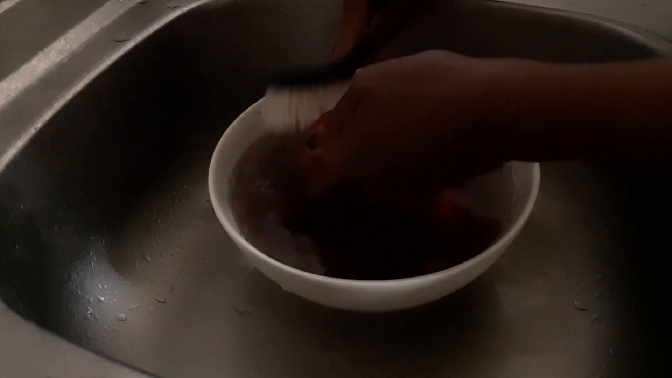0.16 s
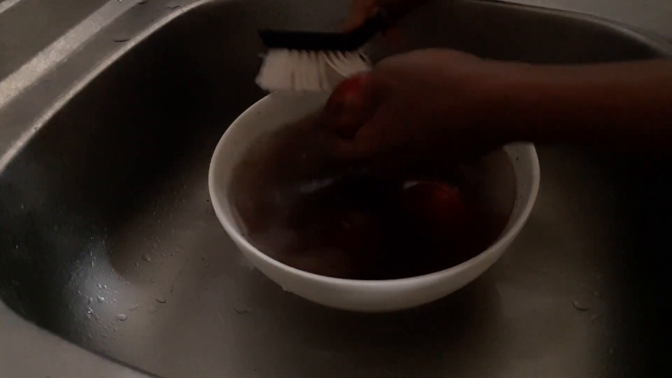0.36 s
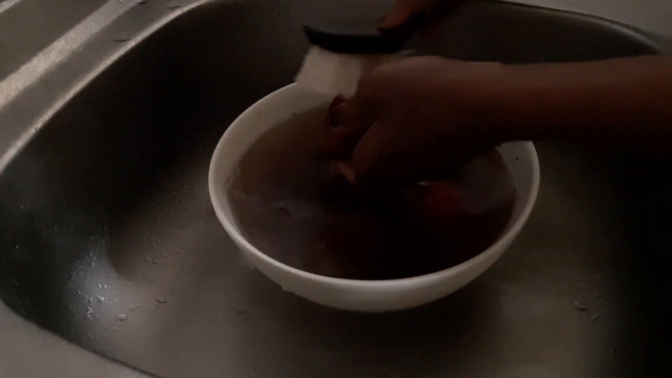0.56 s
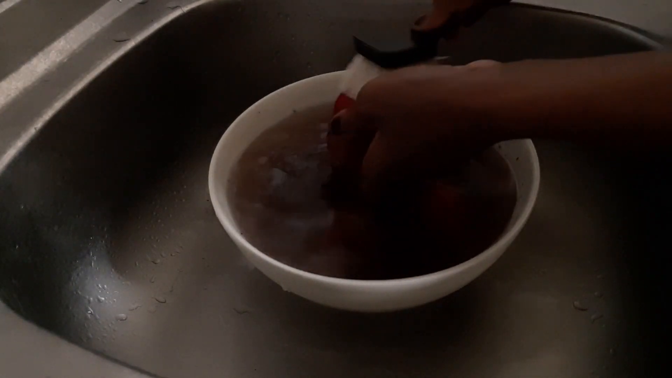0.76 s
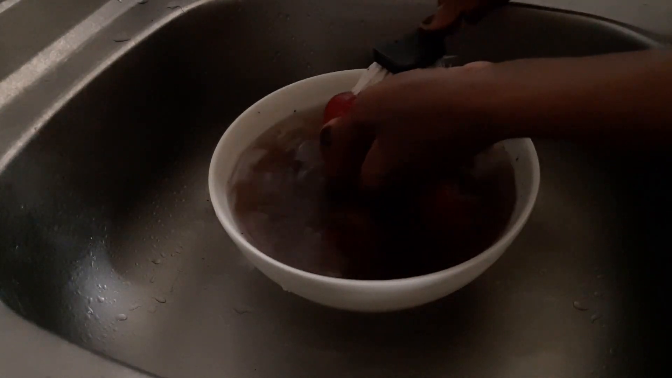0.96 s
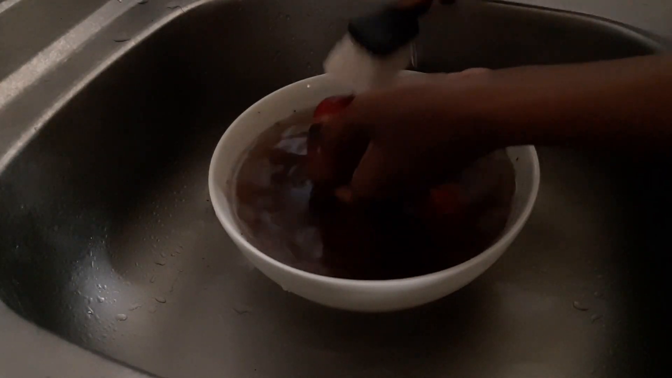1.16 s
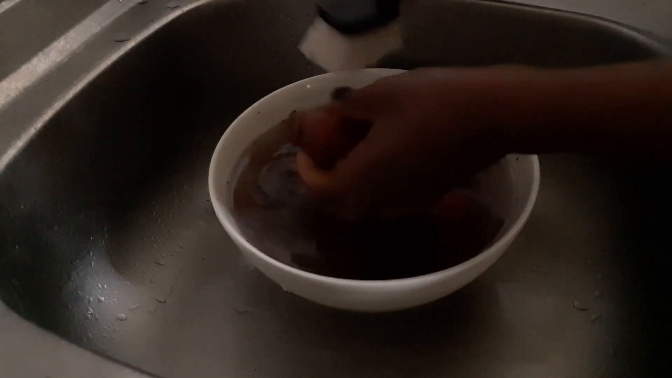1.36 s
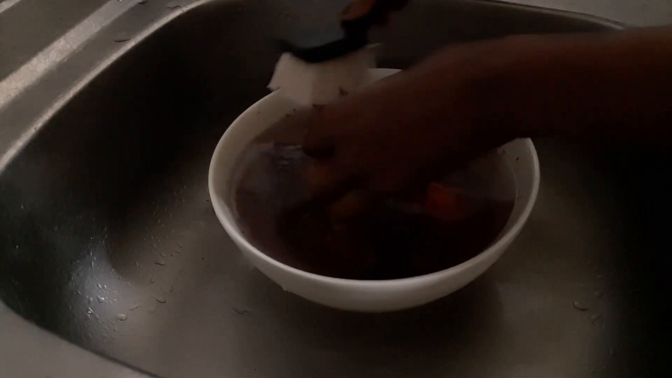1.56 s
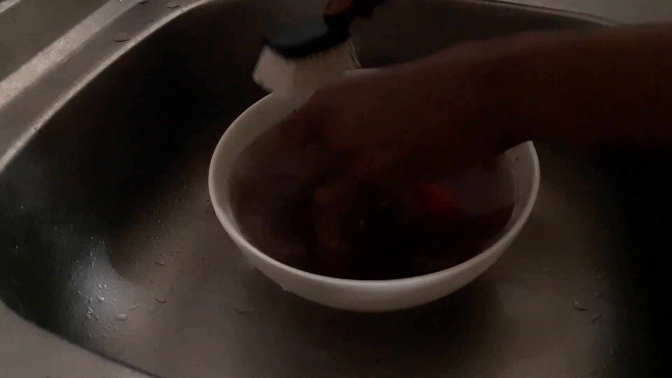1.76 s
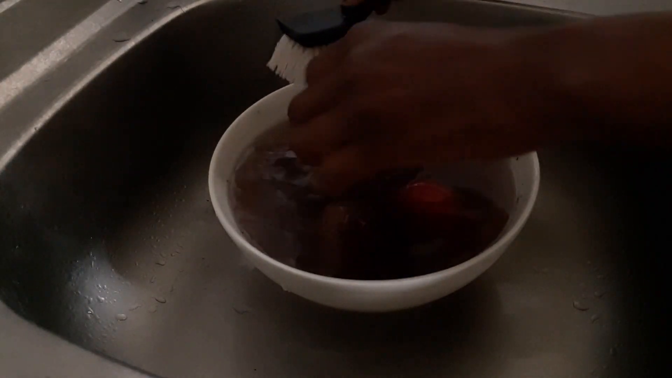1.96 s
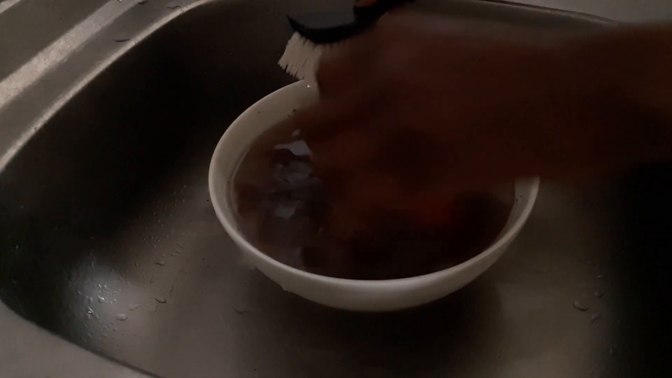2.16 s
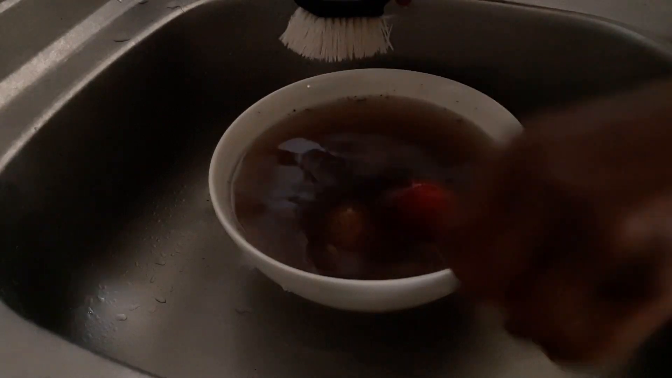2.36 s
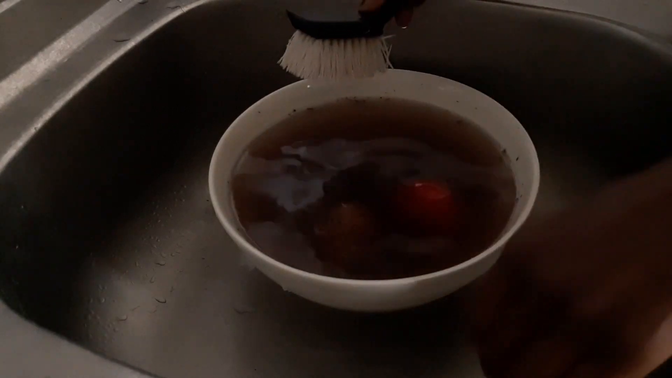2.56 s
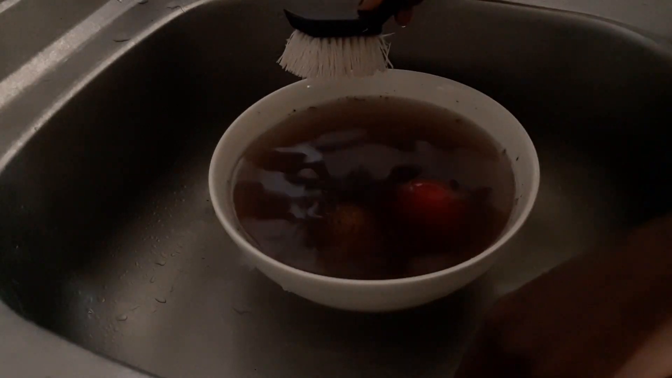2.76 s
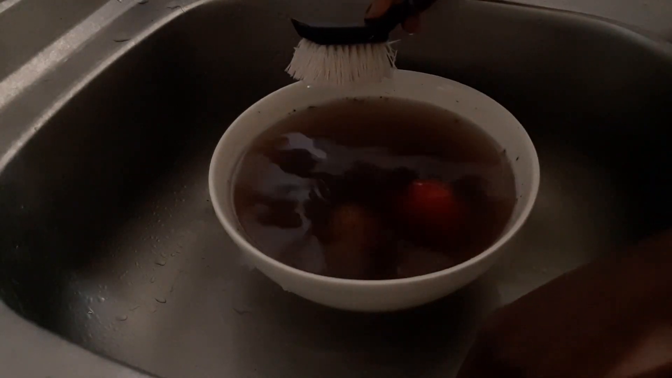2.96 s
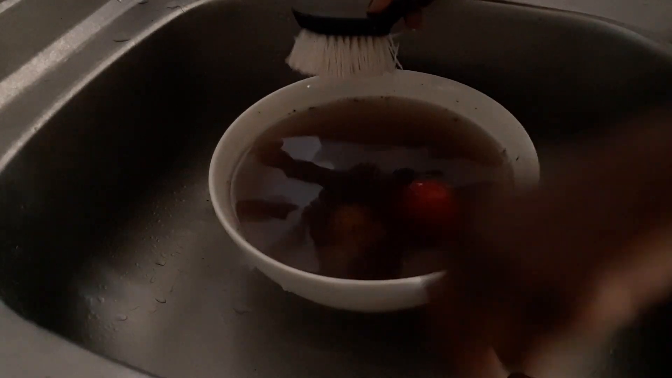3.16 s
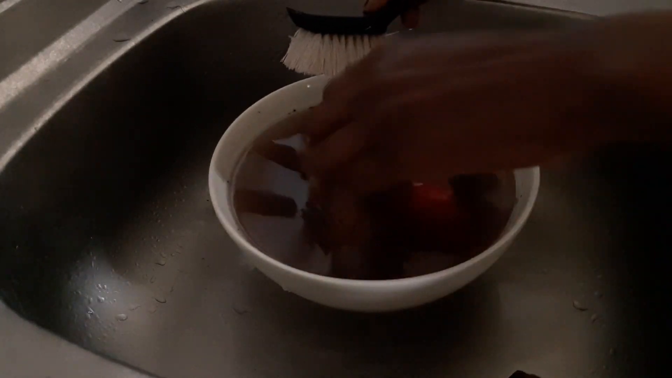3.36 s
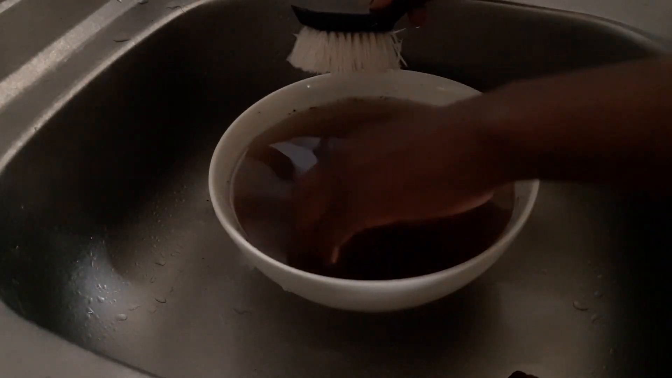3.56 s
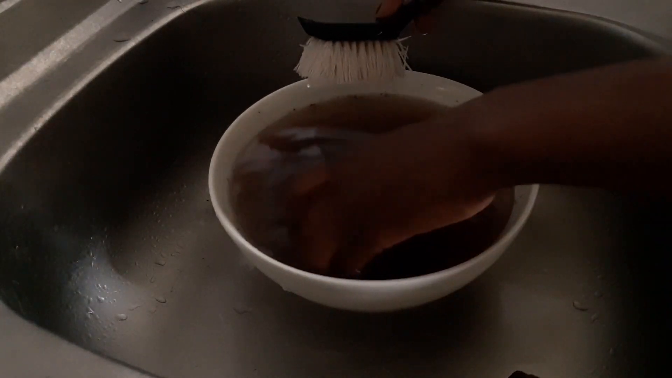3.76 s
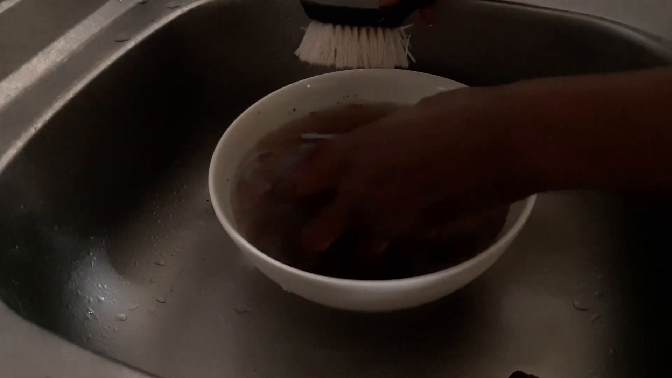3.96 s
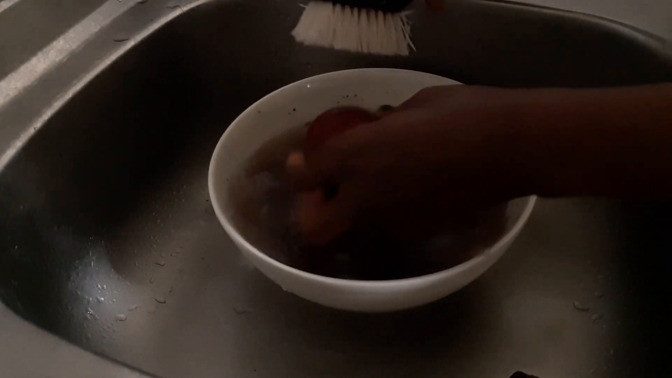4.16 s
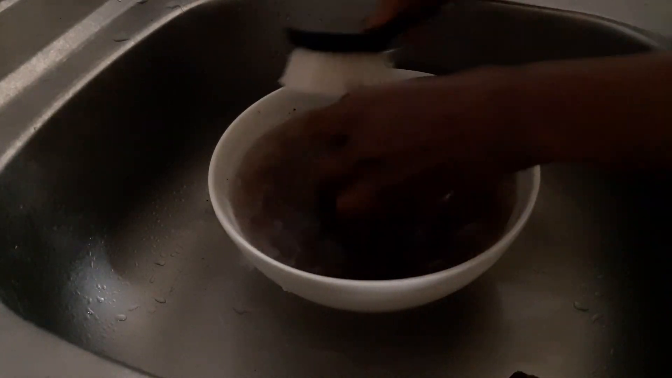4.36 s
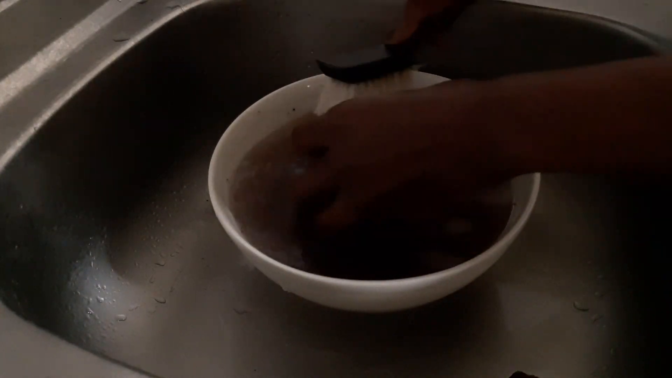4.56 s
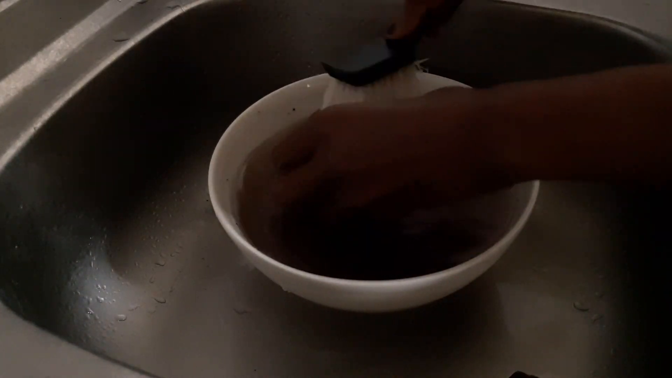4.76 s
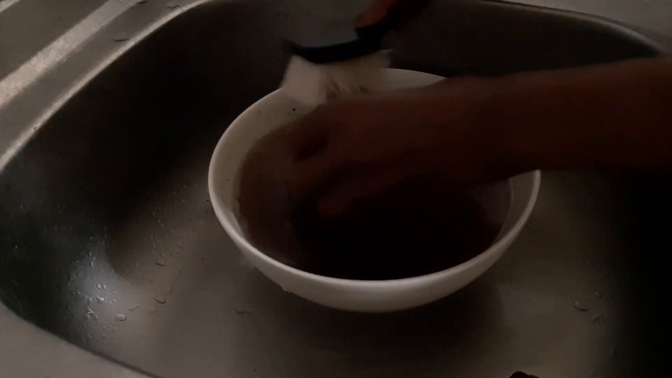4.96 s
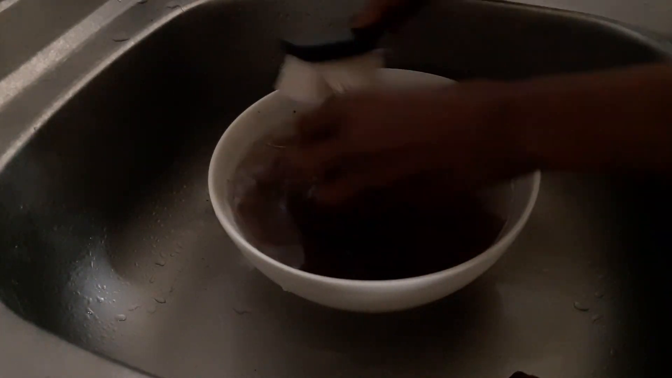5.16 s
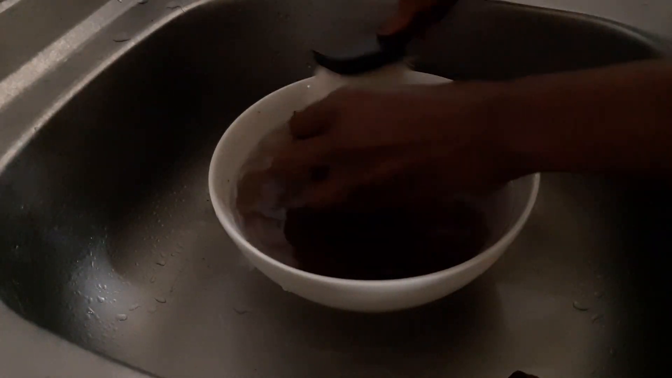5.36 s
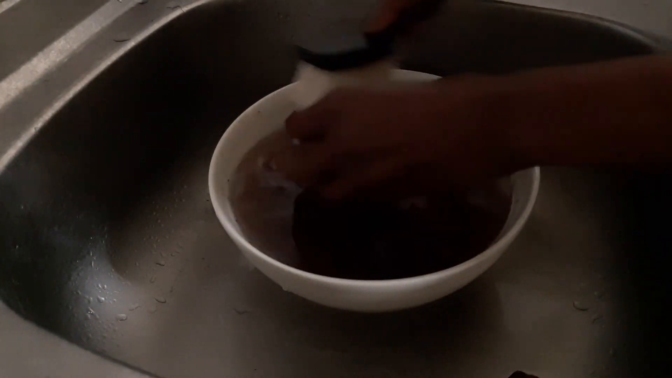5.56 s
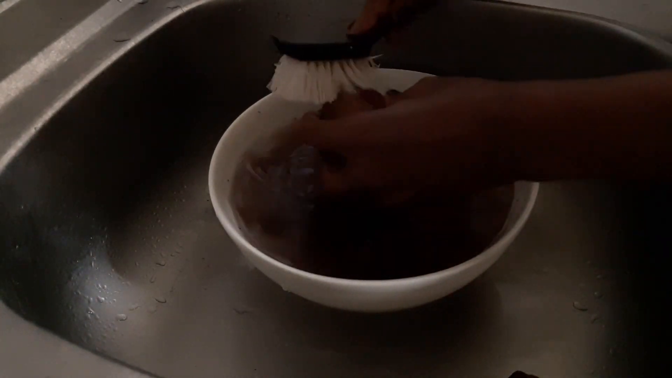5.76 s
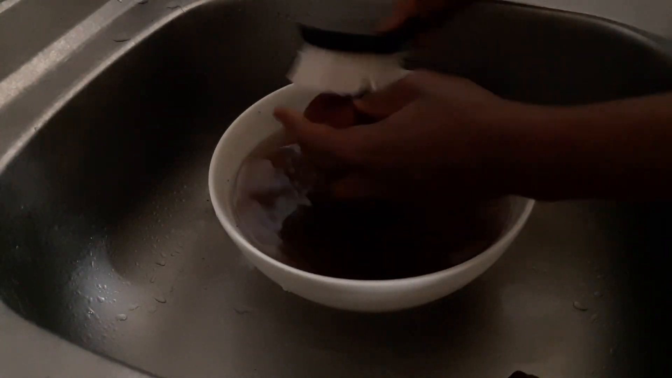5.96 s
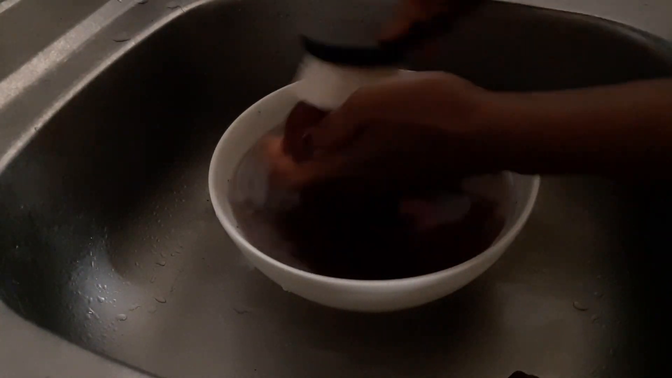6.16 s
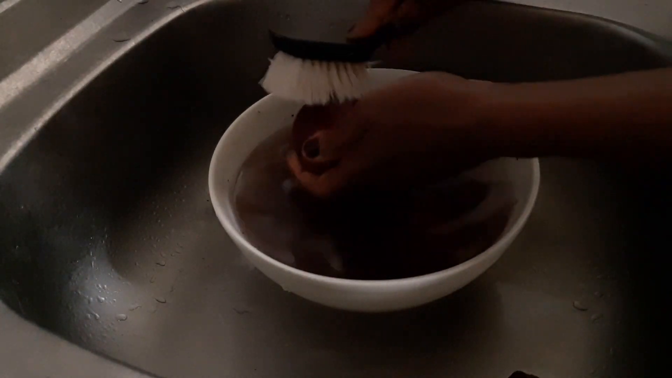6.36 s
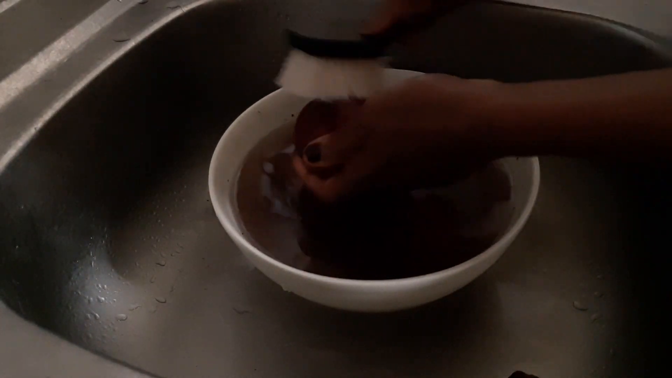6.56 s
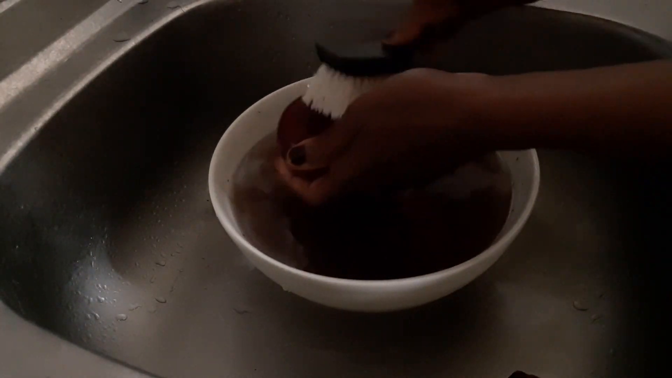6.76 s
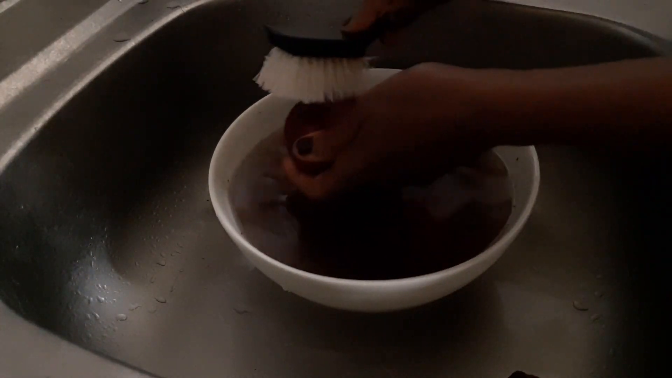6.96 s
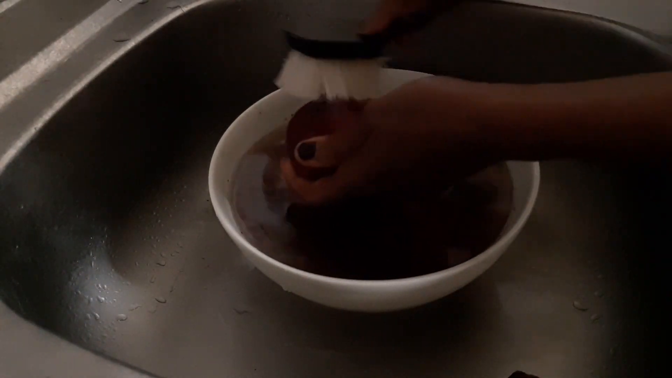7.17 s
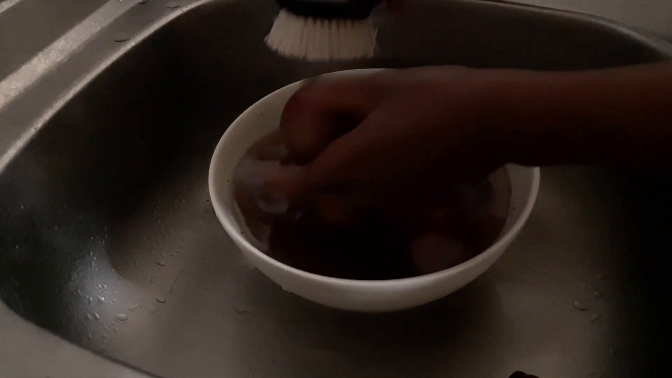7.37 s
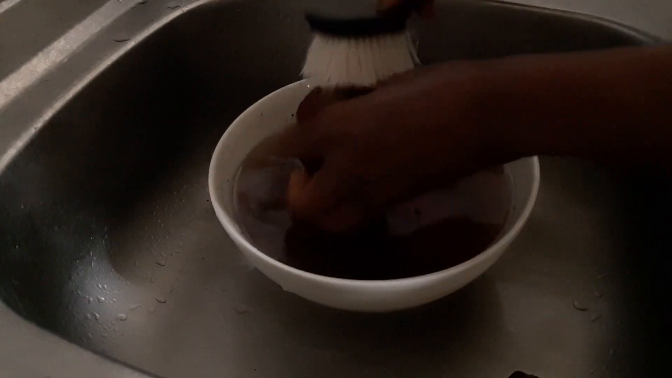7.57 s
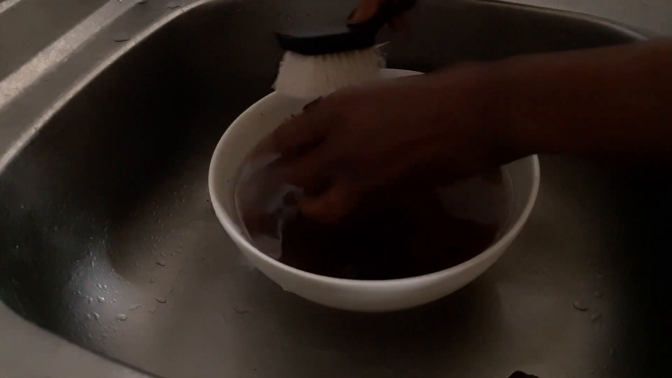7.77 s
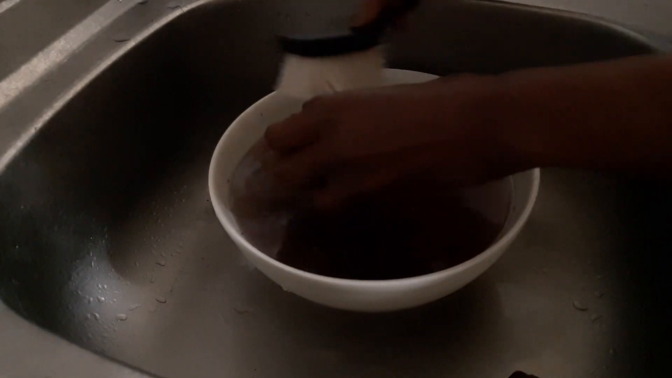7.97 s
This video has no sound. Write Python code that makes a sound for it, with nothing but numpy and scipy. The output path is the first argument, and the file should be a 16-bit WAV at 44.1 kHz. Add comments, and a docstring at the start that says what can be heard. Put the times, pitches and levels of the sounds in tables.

```python
"""Scrubbing roots in a steel sink

A stiff brush scrubs roots over a bowl of water, close up and in stereo. Bristles flick off the skin in
dense clicks that swell with each stroke. Blows and shoves make the sink floor boom, and the bowl clacks,
ticks and is scraped, all over a faint steady hiss."""
import sys
import numpy as np
from scipy import signal
from scipy.fft import rfft, irfft, next_fast_len
from scipy.io import wavfile
from scipy.ndimage import uniform_filter1d

SR = 44100
rng = np.random.default_rng(int(sys.argv[2]) if len(sys.argv) > 2 else 0)


def generate_wav(signal):
    """Clip the signal to [-1, 1] and save it as 16-bit WAV at the path in sys.argv[1]."""
    frames = np.transpose(np.atleast_2d(signal))
    scaled = np.clip(frames, -1, 1) * 32767
    pcm = np.round(scaled).astype(np.int16)
    wavfile.write(sys.argv[1], SR, pcm)


N = 353241
TIME = np.arange(N) / SR


def brush():
    """Pressure swells the bristle clicks; fine tips brighten them, and the drag sounds in the block."""
    # strokes: t/s of full pressure, pressure/dB, rise/s, fall/s, fine tips/dB over the pressure
    strokes = [(.423, -72, .002, 0.025, 12), (.453, -65.5, .002, 0.04, 20), (0.518, -56, 0.077, 0.061, 9),
               (0.634, -53.5, .07, 0.054, 9.5), (.739, -56.5, .002, 0.16, 16), (.83, -52, 0.14, 0.085, 7.5),
               (.925, -48, 0.08, 0.1, 5), (1.02, -55.5, 0.085, 0.15, 7.5), (1.058, -44, 0.0046, 0.065, 6),
               (1.168, -54, 0.036, 0.05, 6.5), (1.346, -69, .002, 0.068, 3), (1.434, -57, 0.043, 0.05, 9),
               (1.632, -63.5, .002, 0.13, 5), (1.709, -55, 0.024, 0.06, 9.5),
               (1.814, -50, 0.037, 0.077, 11), (1.864, -50, 0.088, 0.042, -13), (4.424, -66, .002, 0.2, 0),
               (4.501, -58, 0.068, 0.07, 6), (4.644, -53, 0.08, 0.056, 6.5), (4.73, -56, 0.067, 0.11, 5),
               (4.768, -51.5, 0.016, 0.063, 7), (4.9, -62, 0.069, 0.034, 6), (4.963, -60.5, .006, 0.073, 7),
               (4.994, -55.5, 0.035, 0.065, 1.5), (5.131, -50.5, 0.027, 0.08, 0),
               (5.169, -53, 0.063, 0.031, -4), (5.288, -55, 0.067, 0.073, 4),
               (5.41, -53.5, 0.039, 0.056, -1), (5.44, -54, 0.063, 0.054, 0.5),
               (5.52, -61.5, .002, 0.096, 14), (5.566, -50, 0.046, 0.062, 3.5),
               (5.714, -53.5, .13, 0.097, 2), (5.852, -51, 0.084, 0.043, 6),
               (6.019, -50.5, 0.062, .055, 4.5), (6.105, -52.5, 0.037, .08, 7),
               (6.16, -50.5, 0.094, 0.049, 1), (6.313, -49.5, 0.052, 0.055, 4.5),
               (6.434, -54, 0.069, .12, 6), (6.572, -59, 0.058, 0.27, 6), (6.682, -49, 0.032, 0.09, 5),
               (6.8, -59.5, 0.037, .08, -5), (6.866, -50.5, 0.049, 0.071, 7), (6.99, -53, 0.054, 0.097, 10),
               (7.032, -49, 0.16, 0.071, 1.5), (7.125, -52, 0.04, 0.12, 3), (7.176, -50.5, 0.082, 0.032, 6),
               (7.26, -50, 0.026, 0.11, 4.5), (7.31, -43.5, 0.029, 0.048, 5), (7.375, -61, .05, .03, -6),
               (7.76, -79, .002, .08, 13), (7.8, -60.5, .012, 0.11, 4), (7.87, -62, 0.085, 0.042, -9),
               (7.99, -55.5, 0.051, .1, 5)]
    # bristle tone on the left: f/Hz, level/dB
    tone_left = [(1290, -37), (2200, -34), (2750, -19), (3050, -11.5), (3390, -9.5), (5760, -7), (6310, -5),
                 (7270, -10), (8870, -8), (10900, 0), (15100, 4.5), (16000, 3)]
    # bristle tone on the right: f/Hz, level/dB
    tone_right = [(1290, -19.5), (2200, -23), (2700, -29), (3050, -12), (3330, -6.5), (5760, -4.5),
                  (6210, -7.5), (7150, 1.5), (8730, 1), (13300, 6), (15100, 3.5), (16000, 7.5)]
    # gain ride on the treble above 13 kHz: t/s, gain/dB
    air_ride = [(.4, -6), (.8, -9.5), (1.1, -7), (1.8, -5), (4.4, -4), (5.2, -1), (6, -4.5), (7, -0.5),
                (8.01, 1)]
    # drag against a pressure of -55 dB: t/s, level/dB
    drag_ride = [(.4, -17.5), (1.2, -25.5), (1.85, -17.5), (4.4, -17), (5.0, -22), (5.5, -19), (6.1, -19),
                 (6.6, -19), (7.0, -19), (7.3, -15), (8.01, -23)]
    clicks = steadied(flattened(bristle_clicks()))
    bristles = np.array([evened(coloured(x, tone)) for x, tone in zip(clicks, (tone_left, tone_right))])
    stems = filtered(bristles, 4, 9500)
    tips = filtered(bristles, 4, 9500, "high")
    tips = filtered(tips, 3, 13000) + ride(air_ride) * filtered(tips, 3, 13000, "high")
    power = np.array([swell(*stroke[:4]) ** 2 for stroke in strokes])
    pressure = np.sqrt(power.sum(0))
    tip_gain = np.sqrt(gain_of([stroke[4] for stroke in strokes]) ** 2 @ power)
    follow = 0.85  # the drag follows the pressure only in part
    pull = ride(drag_ride) * pressure ** follow * gain_of(-55) ** (1 - follow)
    scrub = pressure * evened(stems) + tip_gain * evened(tips) + pull * drag(clicks)
    return gain_of(2.5) * panned(8) * scrub


def bristle_clicks(per_s=18000, spread_db=1.7, bunch_db=1.5, busy_db=4.0, tufts=20):
    """Uneven clicks in bunches; each tuft has its own pitch, busy moments and scatter to each side."""
    size_db = spread_db * np.minimum(rng.exponential(1, N), 5) + bunch_db * drift(130)
    impulses = gain_of(size_db) * (rng.random(N) < per_s / SR)
    tuft = rng.integers(0, tufts, N)
    out, t = np.zeros((2, N)), np.arange(2600) / SR
    envelope = decay(t, 0.0067) + decay(t, 0.082, db=-12.5)
    for k, hz in enumerate(np.geomspace(1500, 15000, tufts)):
        noise = rng.standard_normal((2, len(t)))
        scatter = (0.3 * noise + evened(resonate(noise, [(hz, 0.31 * hz, 0)]))) * envelope
        busy = gain_of(busy_db * drift(500))
        out += signal.oaconvolve((impulses * busy * (tuft == k))[None], scatter, axes=1)[:, :N]
    return out


def drag(clicks):
    """The clicks sound in the brush block and bowl hollow; each resonance wavers as the grip changes."""
    # resonances of block and hollow: f/Hz, width/Hz, level/dB
    hollows = [(690, 220, -5), (1130, 260, -13), (1480, 340, -3), (2100, 420, -3), (2450, 500, -3)]
    body = 0
    for k, (hz, width, db) in enumerate(hollows):
        peak = [(hz, width, 0)]
        grip = gain_of(db + 2.5 * drift(4000))
        body += (-1) ** k * grip * evened(resonate(resonate(clicks, peak), peak))
    return evened(filtered(body, 4, (450, 2900), "band"))


def flicks():
    """A clump of bristles lets go: a sharp burst around its own pitch, with a short tail."""
    # bristle clumps: t/s, level/dB, f/Hz
    clumps = [(0.4224, -49.5, 10500), (0.4519, -43.5, 13500), (0.5067, -37, 14700), (0.6559, -29.5, 13100),
              (0.7382, -50, 14800), (0.7761, -41, 10700), (0.8116, -44, 10300), (0.8154, -31, 11900),
              (0.8264, -34, 11800), (0.9088, -36, 9040), (0.9662, -32, 10800), (1.053, -33, 6750),
              (1.3453, -54, 6500), (1.4032, -43, 14200), (1.6307, -43.5, 10600), (1.6541, -42.5, 14700),
              (1.697, -43.5, 6900), (1.7734, -36, 15100), (1.8128, -38, 14100), (4.4228, -48, 15100),
              (4.5067, -38, 15400), (4.6404, -34, 14000), (4.6848, -47, 14400), (4.7636, -30, 14700),
              (4.9804, -42, 15500), (5.1193, -47, 14900), (5.234, -40.5, 15200), (5.5194, -42, 9100),
              (5.9773, -34.5, 10600), (6.1, -32, 14700), (6.1858, -37, 12500), (6.3031, -36, 12500),
              (6.4014, -37, 14300), (6.4384, -40, 13000), (6.4916, -35, 11400), (6.6747, -34, 15400),
              (6.8608, -32.5, 11900), (7.1008, -36, 14800), (7.1237, -36.5, 13000), (7.1681, -31.5, 14200),
              (7.2399, -33.5, 14900), (7.2998, -42, 6200), (7.7588, -63, 15500), (7.7954, -47, 15400),
              (7.9643, -52, 14600)]
    out, t = np.zeros((2, N)), np.arange(2000) / SR
    noises = rng.standard_normal((len(clumps), 2, len(t)))
    pans_db = 7 + 3 * noises[:, 0, 0]  # scattered on the left
    envelope = np.minimum(t / .0005, 1) * (decay(t, .022) + decay(t, .08, db=-13))
    for (s, db, hz), pan_db, noise in zip(clumps, pans_db, noises):
        burst = envelope * (.8 * noise + evened(resonate(noise, [(hz, .25 * hz, 0)])))
        add(out, s, gain_of(db) * panned(pan_db) * burst / abs(burst).max())
    return filtered(out, 5, 3200, "high")


def knocks():
    """A blow rings the sink floor; soft flesh drives the lowest modes, and the bowl rocks as it dies."""
    # blows: t/s, level/dB, hardness as cutoff f/Hz, hand damping/(dB/s) (negative rings longer)
    blows = [(.003, -47, 242, 66), (0.588, -52, 122, 61), (1.063, -50, 129, 54), (3.042, -18, 720, 64),
             (3.745, -59, 254, 56), (3.815, -48, 186, 95), (3.917, -44.5, 122, -8), (4.104, -53, 440, 146),
             (4.307, -40.5, 680, 82), (4.318, -33, 169, 147), (4.364, -37.5, 121, 2), (4.469, -31, 125, 99),
             (4.799, -49, 300, 296), (4.841, -44, 122, 200), (4.884, -49.5, 128, 200),
             (5.367, -49, 124, 54), (6.146, -50.5, 115, 60), (6.456, -52, 118, 60)]
    # modes of the sink floor: f/Hz, level/dB, t60/s
    sink_modes = [(105.4, -3.5, 0.16), (127.6, 5, 0.087), (155, -22, 0.18), (205, -10.5, 0.52),
                  (242.8, 4, 0.18), (284, -0.5, 0.2), (344.2, -3, 0.37), (404, -7, 0.18), (477, -8, 0.17),
                  (521, -10, 0.2), (557, -14, 0.2), (675, -9.5, 0.077), (720, -9.5, 0.08), (765, -36, 0.21)]
    out, t = np.zeros(N), np.arange(SR // 2) / SR
    ring = sum(decay(t, t60, db) * np.sin(2 * np.pi * hz * t) for hz, db, t60 in sink_modes)
    for s, db, hard_hz, damping in blows:
        force = 0.026 * rng.standard_normal(len(t)) * decay(t, 0.27)  # the rocking
        force[0] = 1  # the blow itself
        edge = 0.074 * min(hard_hz / 550, 1) ** 2 * filtered(force, 2, 550)
        push = filtered(force, 4, hard_hz) + edge
        thud = signal.fftconvolve(ring, push)[:len(t)] * gain_of(-damping * t)
        thud = filtered(thud, 6, 98, "high")
        add(out, s, -gain_of(db) * thud / abs(thud).max())
    return out


def tremble(rise_s=0.069, fall_s=0.063):
    """A hand leans on the bowl and shakes the lowest sink modes, over a deeper rumble."""
    # shoves of the hand: t/s, boom/dB, rumble/dB
    shoves = [(0.0, -39, -68), (.6, -74, -81), (1.03, -95, -78), (3.03, -66, -64), (3.79, -50, -54),
              (4.129, -51.5, -56.5), (4.35, -45.5, -72), (4.48, -50, -56), (4.8, -54, -80),
              (8.01, -58.5, -83)]
    # low sink resonances: f/Hz, width/Hz, level/dB
    boom_modes = [(107.1, 3.8, -2), (120.23, 2.44, -2), (190, 20, -17), (300, 16, -14.5)]
    # trembling between shoves: t/s, level/dB
    boom_ride = [(0, -63), (2, -63), (2.8, -67.5), (3.6, -66), (4.9, -55.5), (5.3, -67.5), (8.01, -64.5)]
    mid, low, side = rng.standard_normal((3, N))
    shaking = np.array([mid + 0.3 * side, mid - 0.43 * side])
    boom = evened(resonate(resonate(shaking, boom_modes), [(155, 137, 0)]))
    rumble = evened(filtered(low, 3, (34, 78), "band"))
    boom_gain = ride(boom_ride) + sum(swell(s, db, rise_s, fall_s) for s, db, _ in shoves)
    rumble_gain = gain_of(-88.5 + 8 * drift(3000))
    rumble_gain += sum(swell(s, db, rise_s, fall_s) for s, _, db in shoves)
    return boom_gain * boom + rumble_gain * rumble


def clacks():
    """The bowl jolts on the steel: a dying rattle through its broad resonances."""
    # jolts: t/s, level/dB, t60/s
    jolts = [(3.048, -41.5, 0.15), (4.314, -59.5, 0.18)]
    # bowl resonances, damped by the water: f/Hz, width/Hz, level/dB
    bowl_modes = [(720, 83, 6.5), (1110, 40, -7.5), (1274, 300, 6.5), (1694, 150, -1.5), (2425, 390, 0.5),
                  (2850, 92, -3), (3570, 250, -2.5), (4440, 120, 0), (4970, 460, -3), (6510, 280, -4),
                  (7560, 180, -8)]
    out, t = np.zeros((2, N)), np.arange(SR // 3) / SR
    for s, db, t60 in jolts:
        a, b = rng.standard_normal((2, len(t)))
        rattle = evened(resonate(np.array([a + .5 * b, b - a]), bowl_modes))
        envelope = np.minimum(t / 0.00098, 1) * (decay(t, t60) + decay(t, 3 * t60, db=-30))
        add(out, s, gain_of(db) * envelope * rattle)
    return out


def ticks():
    """Small hard ticks: a ring blurred by neighbouring modes, with a wide snap on top."""
    # ticks: t/s, level/dB, f/Hz, width/Hz, t60/s, relative snap/dB
    hits = [(.008, -69.5, 2216, 61, 0.28, -30), (2.262, -67, 14200, 900, 0.055, -19),
            (3.05, -50.5, 4700, 345, 0.18, -27), (3.768, -71, 2190, 15, .33, -30),
            (4.108, -63, 3490, 200, .22, -3), (4.109, -63.5, 4270, 660, 0.24, -19),
            (4.311, -54.5, 624, 200, 0.12, -38), (4.318, -66, 4600, 300, 0.23, -21),
            (4.42, -65.5, 2800, 780, 0.19, -10)]
    out, t = np.zeros((2, N)), np.arange(SR // 4) / SR
    for s, db, hz, width, t60, snap_db in hits:
        noise = rng.standard_normal((2, len(t)))
        blur = width / (width + 200)
        band = evened(resonate(noise, [(hz, width, 0)]))
        ring = (2 * (1 - blur) * np.sin(2 * np.pi * hz * t) + 1.68 * blur * band) * decay(t, t60)
        snap = np.diff(noise, prepend=0) * decay(t, t60 / 2, snap_db)
        add(out, s, gain_of(db) * np.minimum(t / .001, 1) * (ring + snap))
    return out


def scrapes():
    """Grit rubs the glaze and keeps the bowl singing."""
    # slides on the bowl: t/s, level/dB, rise/s, fall/s
    slides = [(0.0, -56, .01, 0.042), (.128, -67.5, 0.11, 0.047), (3.762, -66.5, 0.012, 0.11),
              (3.85, -78, 0.059, .09)]
    # resonances of the rubbed bowl: f/Hz, width/Hz, level/dB
    rubbed_modes = [(3280, 260, -23), (4950, 440, -7.5), (5700, 1200, -2.5), (6340, 490, -14),
                    (764, 1300, -2.5), (1610, 330, -16.5)]
    grit = rng.standard_normal((2, N))
    singing = evened(resonate(grit + 0.11 * grit[::-1], rubbed_modes))
    return sum(swell(*slide) for slide in slides) * singing


def kitchen(x, t60=0.42):
    """Sparse echoes of random sign off the basin and walls, different on each side."""
    t = np.arange(SR // 2) / SR
    taps = rng.choice([-1., 1.], (2, len(t))) * (rng.random((2, len(t))) < .05)
    taps *= decay(t, t60) * (t > .004)
    return signal.fftconvolve(x[None], taps / np.linalg.norm(taps[0]), axes=1)[:, :N]


def hiss():
    """Steady room tone and microphone hiss, partly alike on both sides only in the lows."""
    # tone of the noise floor: f/Hz, level/dB
    floor_tone = [(82, -41), (140, -4.5), (155, -19.5), (303, -20.5), (433, -25.5), (469, -23), (529, -29),
                  (997, -29.5), (1320, -31.5), (5380, -31), (7990, -34), (12600, -31.5), (16000, -30.5)]
    # stereo likeness: f/Hz, left-right correlation
    likeness = [(60, -0.061), (180, 0.57), (550, 0.3), (1650, -0.052), (4970, -0.072), (15000, -0.046)]
    left, other = rfft(rng.standard_normal((2, N)))
    hz = np.fft.rfftfreq(N, 1 / SR)
    alike = curve_at(likeness, hz)
    right = alike * left + np.sqrt(1 - alike ** 2) * other
    spectra = np.array([left, right]) * gain_of(curve_at(floor_tone, hz))
    return gain_of(-71.5) * evened(irfft(spectra, N))


def gain_of(db):
    """Decibels to a factor."""
    return 10 ** (np.asarray(db) / 20)


def decay(t, t60, db=0):
    """Envelope that starts at db and falls 60 dB every t60 seconds."""
    return gain_of(db - 60 * t / t60)


def ride(points):
    """Fader move through points (t/s, level/dB)."""
    return gain_of(np.interp(TIME, *np.transpose(points)))


def swell(s, db, rise_s, fall_s, edge_db=-15, roundness=1.22):
    """Gain that peaks at time s and is at edge_db of its peak one rise before and one fall after."""
    out = np.zeros(N)
    near = slice(max(round((s - 5 * rise_s) * SR), 0), round((s + 5 * fall_s) * SR))
    away = np.maximum((s - TIME[near]) / rise_s, (TIME[near] - s) / fall_s)
    out[near] = gain_of(db + edge_db * away ** roundness)
    return out


def smoothed(x, size):
    """Two moving averages of size samples."""
    return uniform_filter1d(uniform_filter1d(x, size), size)


def drift(size):
    """Smooth random wander of rms 1 that changes within about size samples."""
    return evened(smoothed(rng.standard_normal(N), size))


def steadied(x):
    """The hand keeps the force even: swells slower than a bunch of clicks are gently compressed."""
    return x / smoothed((x ** 2).mean(0), 1100) ** 0.091


def evened(x):
    """Scales to rms 1."""
    return x / np.sqrt(np.mean(x ** 2) + 1e-20)


def flattened(x):
    """Evens out the long-term spectrum."""
    spectrum = rfft(x)
    return irfft(spectrum / np.sqrt(uniform_filter1d(abs(spectrum) ** 2, 4001)), N)


def curve_at(points, hz):
    """Value of a curve on a log-frequency axis."""
    f, value = np.transpose(points)
    return np.interp(np.log(hz + 1), np.log(f + 1), value)


def coloured(x, tone):
    """Equalises by a curve (f/Hz, level/dB)."""
    size = next_fast_len(N)
    gain = gain_of(curve_at(tone, np.fft.rfftfreq(size, 1 / SR)))
    return irfft(rfft(x, size) * gain, size)[..., :N]


def filtered(x, order, hz, kind="low"):
    """Low-, high- or band-pass with a flat passband."""
    return signal.sosfilt(signal.butter(order, hz, kind, fs=SR, output="sos"), x)


def resonate(x, peaks):
    """Parallel resonances (f/Hz, width/Hz, level/dB)."""
    out = 0
    for hz, width, db in peaks:
        pole = np.exp((2j * np.pi * hz - np.pi * width) / SR)
        out += gain_of(db) * np.sqrt(1 - abs(pole)) * signal.lfilter([1], [1, -pole], x).imag
    return out


def panned(db):
    """Stereo gains with the left louder by db."""
    return gain_of([[db / 2], [-db / 2]])


def add(mix, s, sound):
    """Mixes a sound in at time s."""
    part = mix[..., round(s * SR):][..., :sound.shape[-1]]
    part += sound[..., :part.shape[-1]]


def scene():
    """Brush and sink sit to the left; only the knocks feed the kitchen echoes."""
    thuds = knocks()
    sink = panned(4.0) * thuds + gain_of(-12) * kitchen(thuds) + panned(1.5) * tremble()
    return brush() + flicks() + sink + clacks() + ticks() + scrapes() + hiss()


def record(dry, cutoff_hz=15850):
    """A steep low-pass trims the very top."""
    lowpass = signal.firwin(511, cutoff_hz, window=("kaiser", 9), fs=SR)
    return signal.oaconvolve(dry, lowpass[None], "same")


dry = scene()
out = record(dry)
generate_wav(out)
```